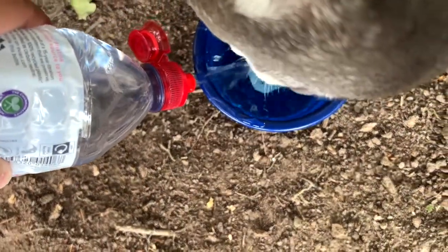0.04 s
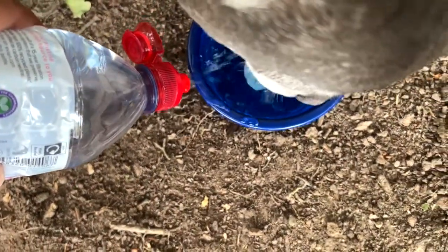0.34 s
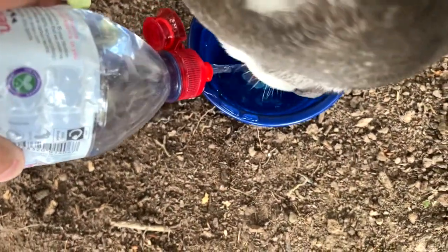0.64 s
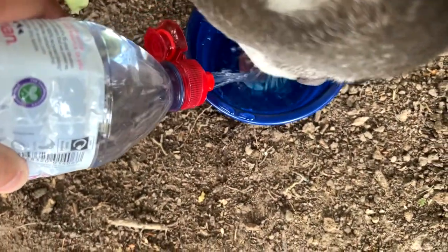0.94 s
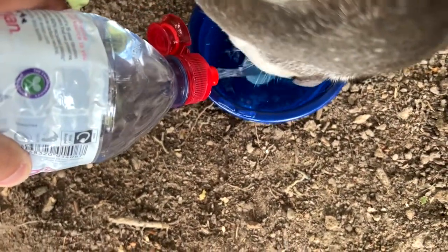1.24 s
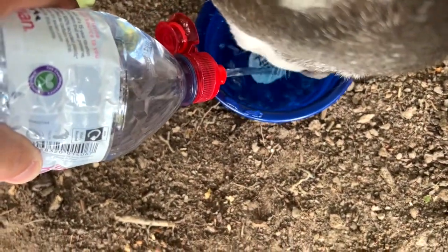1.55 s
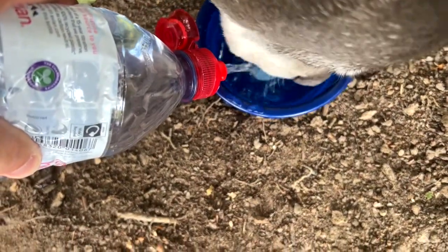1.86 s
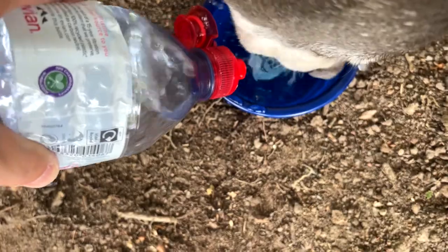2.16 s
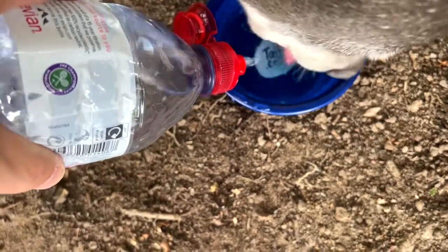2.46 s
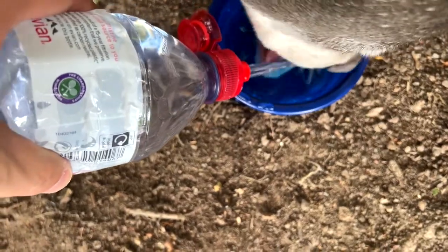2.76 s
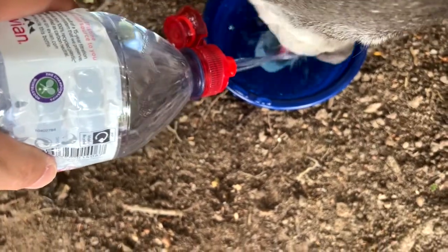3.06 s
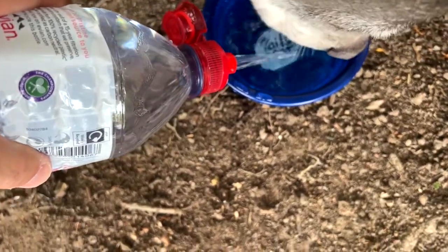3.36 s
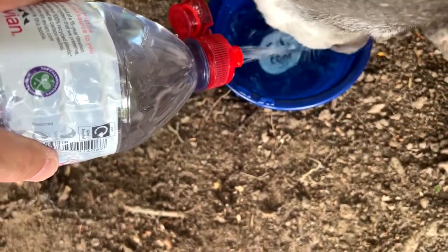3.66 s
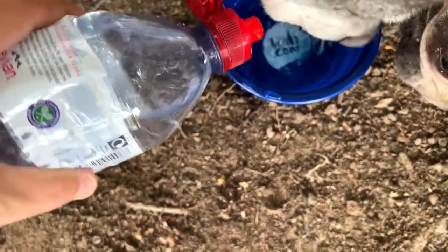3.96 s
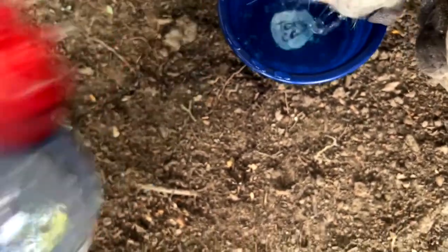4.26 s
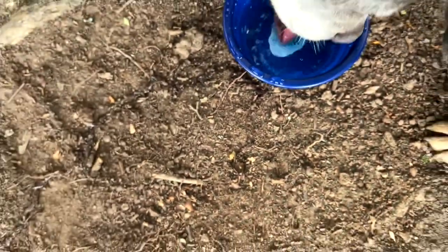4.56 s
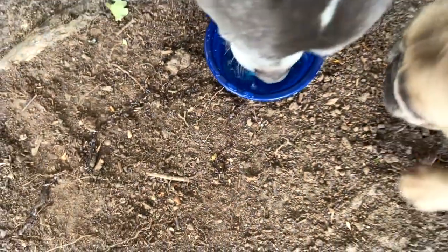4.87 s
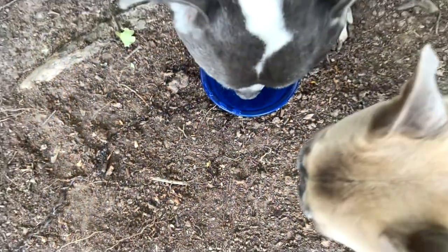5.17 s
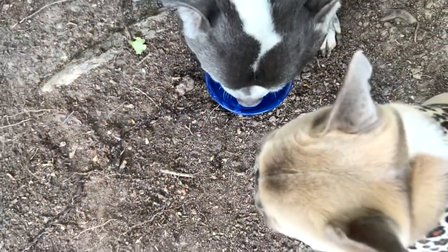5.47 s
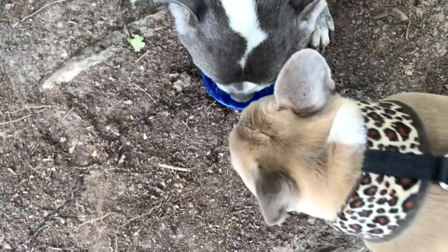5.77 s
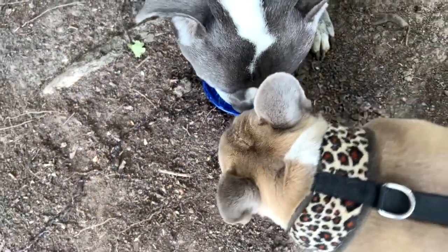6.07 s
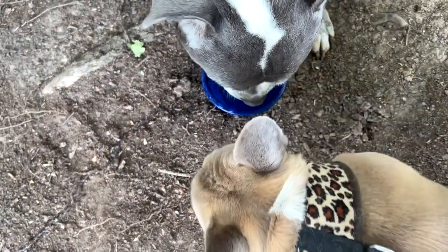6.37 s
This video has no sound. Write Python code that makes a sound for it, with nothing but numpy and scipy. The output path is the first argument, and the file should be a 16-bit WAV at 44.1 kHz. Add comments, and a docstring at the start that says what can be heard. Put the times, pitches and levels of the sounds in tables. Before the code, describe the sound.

From the start, water squirts in uneven spurts from a plastic bottle into a small bowl while a dog laps close to the microphone, about three licks a second. Each lick throws drops and small ringing bubbles and ends in a wet smack. Gulps, low sloshing and soft bottle knocks sit underneath, with one stronger thump at about 1 second. The splashing grows livelier and brighter from around 2 to 4 seconds. Near 4 seconds the bottle is swung away, making a deep flutter of air on the microphone and a few low bumps. By 4.6 seconds the trickle has stopped and the splashes sound duller. The lapping goes on more softly until the end at about 6.5 seconds. Between 5.1 and 5.9 seconds a distant bird gives five faint, short falling whistles over quiet outdoor air.

```python
"""From the start, a plastic bottle squirts water into a small bowl while a dog laps, about three licks a second.
Each lick throws drops and ringing bubbles and ends in a wet smack; gulps and bottle knocks thump below.
Near 4 s the bottle is swung away with a deep flutter of air; by 4.6 s the jet is gone and the spray duller.
The lapping goes on more softly, and from 5.1 s a far bird whistles five times over quiet outdoor air."""
import sys
import numpy as np
from scipy import signal
from scipy.fft import rfft, irfft
from scipy.io import wavfile
from scipy.ndimage import uniform_filter1d

SR = 44100
rng = np.random.default_rng(int(sys.argv[2]) if len(sys.argv) > 2 else 0)


def transcribe(u):
    """Save the signal u as a 16-bit wav file named by the first command-line argument.

    u: samples, shape (n,) or (channels, n), limited to [-1, 1]; the rate is SR.
    q: integer samples, one column per channel.
    """
    v = np.clip(np.atleast_2d(u).T, -1, 1)
    q = np.round(v * 32767).astype(np.int16)
    wavfile.write(sys.argv[1], SR, q)


N = 282842
TIME = np.arange(N) / SR
HZ = np.fft.rfftfreq(N, 1 / SR)


# Tongue in the water: t/s, length/s, spatter/dB, spray/dB, mid-lap swell/dB, slosh/dB
LAPS = [(-0.04, 0.15, -48, -57, -1, -65), (0.168, 0.032, -49, -65, -1, -49),
        (0.32, 0.13, -48, -65.5, -7, -45), (0.646, 0.11, -47, -55, 2.5, -42),
        (1.011, 0.13, -46, -51, -1.5, -50.5), (1.353, 0.11, -42, -51, -2, -50.5),
        (1.764, 0.081, -36.5, -42, -10, -48), (2.071, 0.14, -40, -45.5, 1, -46.5),
        (2.431, 0.16, -47.5, -59, 3.5, -43.5), (2.784, 0.12, -42, -47.5, -1, -44),
        (3.153, 0.12, -43, -42.5, -3, -43), (3.505, 0.099, -36.5, -42.5, -6.5, -45),
        (3.856, 0.14, -40.5, -49.5, -1.5, -43.5), (4.222, 0.11, -39.5, -46.5, 0.5, -37),
        (4.581, 0.15, -48.5, -50, 1.5, -53), (4.942, .11, -45, -47, -6, -43.5),
        (5.24, 0.19, -53, -53.5, -0.5, -52), (5.632, 0.12, -49.5, -54, -2.5, -46.5),
        (6.001, 0.14, -51, -54.5, 1.5, -52.5), (6.356, 0.067, -48, -54.5, -4.5, -45)]


def laps(column):
    """Gain of the tongue's stirring: quick rise, sagging or swelling hold, quick fall, dribble from the lips."""
    dribble_delay_s, dribble_width_s, dribble_db = 0.14, 0.12, -17.5
    power = np.zeros(N)
    for row in LAPS:
        t, length_s, swell_db = TIME - row[0], row[1], row[4]
        swell = amp(swell_db * np.sin(np.pi * np.clip(t / length_s, 0, 1)))
        splash = plateau(t, length_s, rise_s=0.01, fall_s=0.0098) * swell
        offset = (t - length_s - dribble_delay_s) / dribble_width_s
        dribble = amp(dribble_db) * np.exp(-np.minimum(offset ** 2, 20))
        power += (amp(row[column]) * (splash + dribble)) ** 2
    return np.sqrt(power)


# Spurts from the bottle, then its swill as it swings away: t/s, spatter/dB, spray/dB
JET_SPURTS = [(0, -55, -54.5), (.28, -65, -61), (.34, -50, -51.5), (.6, -54.5, -62), (.8, -51, -58),
              (.95, -46, -54.5), (1.2, -53.5, -57), (1.4, -48, -59.5), (1.55, -54, -63), (1.9, -52.5, -57),
              (2.02, -67, -73), (2.42, -52.5, -53.5), (2.72, -52.5, -61.5), (2.82, -44, -45),
              (3.0, -48, -51), (3.12, -50, -48.5), (3.46, -46, -53), (3.78, -50.5, -54.5), (4.05, -56, -72),
              (4.13, -50.5, -56.5), (4.47, -55, -66), (4.58, -83, -64)]
# Small bubbles: f/Hz, level/dB
SPATTER_SPECTRUM = [(300, -13.5), (500, 1), (800, -10.5), (1150, 5.5), (1650, -2.5), (2150, 0.5),
                    (3200, -3.5), (4100, -10.5), (4800, -8), (6000, -14), (8000, -21), (10000, -26),
                    (16000, -30.5)]
# Fine spray: f/Hz, level/dB
SPRAY_SPECTRUM = [(3500, 5), (5800, -3), (7000, 0.5), (8300, 2.5), (9000, 1), (10000, -9.5), (11700, 1),
                  (14000, -2.5), (16000, -6.5)]


def trickle():
    """Tongue and jet stir the water: calm, it hisses; stirred hard, separate drops and mist fly."""
    calm_db, jet_grain_db, drops_fly_db, mist_flies_db = -62, -6, -48, -51
    tongue, jet = np.hypot(laps(column=2), amp(calm_db)), level(JET_SPURTS, 1)
    stir = np.hypot(tongue, jet)
    fling = np.hypot(laps(column=3), level(JET_SPURTS, 2))
    bubbles = droplets(per_s=1900, spread_db=4.6, low_hz=450, high_hz=7500,
                       cycles=8.5, glide=.35, rise_cycles=2.2)
    mist = droplets(per_s=1400, spread_db=6.6, low_hz=4500, high_hz=15000,
                    cycles=4.5, glide=.2, rise_cycles=1.6)
    coarse = np.hypot(tongue, jet * amp(jet_grain_db))  # the jet breaks into finer drops
    wash = np.where(TIME < JET_SPURTS[-1][0], 1, amp(-6))  # jet gone: even soft laps click
    drop_share = coarse / (coarse + amp(drops_fly_db) * wash)
    mist_share = fling ** 2 / (fling ** 2 + amp(mist_flies_db) ** 2)
    spatter = colour(drop_share * unit(bubbles) + amp(-21.5) * rng.standard_normal(N), SPATTER_SPECTRUM)
    spray = colour(mist_share * unit(mist) + amp(-11) * rng.standard_normal(N), SPRAY_SPECTRUM)
    clumps = unit(uniform_filter1d(uniform_filter1d(rng.standard_normal(N), 400), 300))
    spatter = unit(steadied(spatter, window_s=.06) * amp(2.0 * drop_share * clumps)) * stir
    spray = unit(steadied(spray, window_s=.08) * amp(2.6 * mist_share * clumps)) * fling
    return panned(spatter, pan_db=3.5) + panned(lifted(spray), pan_db=0.5)


# Tongue smacks and splashes: peak t/s, level/dB over 10 ms, spread/s, cavity f/Hz, treble/dB
SMACKS = [(0.047, -32, 0.0045, 1265, -10), (0.207, -31, 0.0029, 1600, 3.5),
          (0.215, -34.5, 0.0032, 1650, -1), (0.423, -32.5, 0.007, 1280, -8),
          (0.736, -33.5, 0.0022, 1160, -7), (0.744, -25.5, 0.0019, 3256, -5),
          (0.755, -35, 0.0033, 2200, -23), (1.119, -32, 0.0017, 1230, -18), (1.129, -32, 0.0026, 1210, 1.5),
          (1.457, -27.5, 0.0022, 754, -2), (2.162, -26, 0.0017, 2980, -20),
          (2.178, -32.5, 0.0033, 1200, -3), (2.211, -32.5, 0.00096, 1790, -5),
          (2.2155, -31.5, 0.0019, 1540, -3), (2.556, -27, 0.002, 1230, -2), (2.797, -34, 0.0093, 1110, -38),
          (2.886, -29, 0.0058, 990, -8), (3.273, -30, 0.0048, 1290, -1.5), (3.6, -26, 0.0035, 1350, -1),
          (3.982, -28.5, 0.0027, 1530, -11), (3.993, -32, 0.00297, 720, -17),
          (4.273, -31.5, 0.0034, 1260, -14), (4.318, -28.5, 0.0052, 1170, 3.5),
          (4.702, -31.5, 0.0025, 1276, -35), (5.023, -34.5, 0.0021, 2010, -11),
          (5.033, -29.5, 0.0031, 1380, 1.5), (5.398, -42, 0.0051, 690, 2), (5.411, -38, 0.0055, 1290, 0),
          (5.735, -35.5, 0.0043, 1380, -3), (6.121, -39, 0.0053, 1220, 14)]
# Wet mouth: f/Hz, level/dB
MOUTH_SPECTRUM = [(150, -16), (350, 9.5), (750, -14), (1200, 12.5), (1650, -4.5), (2200, 7.5), (3200, -2),
                  (5000, -3), (7000, -11.5), (10000, -22), (12000, -20), (16000, -36)]


def smacks():
    """The wet tongue peels away in a ragged run of snaps and bubbles that ring the mouth."""
    snaps_per_s, rise_share, fall_share = 1500, 1.26, 0.93
    out, t = np.zeros((2, N)), np.arange(-1500, 2500) / SR
    for peak_s, db, spread_s, cavity_hz, treble_db in SMACKS:
        snaps = rng.standard_normal(len(t)) * (.06 + (rng.random(len(t)) < snaps_per_s / SR))
        flank_s = spread_s * np.where(t < 0, rise_share, fall_share)
        snaps = steadied(snaps, window_s=.004) * np.exp(-abs(t) / flank_s)
        spectrum = [(hz, gain_db + np.clip(np.log2(hz / 3500), 0, 1) * (treble_db + 11.5))
                    for hz, gain_db in MOUTH_SPECTRUM]
        ring = bubble(cavity_hz, width_hz=94, glide=rng.uniform(-0.045, 0.09), rise_cycles=0.043)
        cavity = signal.fftconvolve(snaps, ring)[:len(t)]
        foam = froth(t, spread_s, low_hz=715, high_hz=4890)
        sound = unit(colour(snaps, spectrum)) + amp(-2) * unit(cavity) + amp(-3) * unit(foam)
        add(out, peak_s + t[0], panned(burst(sound, db), pan_db=3.5))
    return out


def froth(t, spread_s, low_hz, high_hz, count=7):
    """A few bubbles of mixed size burst around t = 0."""
    out = np.zeros((1, len(t)))
    for when, size, climb in rng.random((count, 3)):
        hz = low_hz * (high_hz / low_hz) ** size
        ring = bubble(hz, width_hz=130 + 0.016 * hz, glide=0.55 * climb, rise_cycles=1.15)
        add(out, (when - .6) * 2.5 * spread_s - t[0], unit(ring)[None] / np.sqrt(hz))
    return out[0]


# Single drops and bursting bubbles: t/s, level/dB over 10 ms, f/Hz, snap/dB, left over right/dB
POPS = [(0.2224, -36.5, 1230, -29, 6), (0.657, -41.5, 1940, -19, 7), (1.104, -43.5, 700, -6, 1),
        (1.23, -44.5, 2160, -9, 3), (1.4377, -33.5, 1230, -17, 4), (1.3113, -38.5, 1310, -3, 3),
        (1.3884, -38, 1090, -1, 5), (1.6656, -40, 1480, -9.5, 4), (1.775, -38.5, 844, -2, 10),
        (1.8143, -36.5, 4330, 1, 3), (1.8565, -36.5, 2200, -14, 12), (2.036, -42.5, 5070, -43, 1),
        (2.088, -32, 1190, -10, 5), (2.1703, -23.5, 666, 12, 3), (2.3582, -33.5, 730, -20, 19),
        (2.396, -36, 770, -20, 19), (2.434, -35.5, 1740, -34, 13), (2.4414, -35.5, 4200, -6, 8),
        (2.471, -34, 1290, -11, 2), (2.5373, -32, 2210, -41, 2), (2.5448, -29.5, 2400, -13, 3),
        (2.7854, -33.5, 1330, -33, 1), (3.1851, -27, 3870, -17, 6), (3.2213, -28, 1800, -11, 18),
        (3.255, -30, 464, -12, 0), (3.4139, -26.5, 670, -18, 10), (3.5253, -34, 4900, -8, 2),
        (3.542, -36, 627, -11, 0), (3.7424, -33.5, 1160, -12, 1), (3.8127, -25.5, 2110, -21, 1.5),
        (3.841, -34.5, 3000, -7, 1), (3.89, -27, 980, -13, 14), (3.899, -30, 3370, -15, 5),
        (3.9498, -34, 1720, 3, 0), (3.993, -23.5, 464, -30, 7), (4.2533, -32, 6900, -1, 0),
        (4.272, -26, 493, -3, 7), (4.338, -30.5, 2150, -2, 10), (4.5851, -38.5, 3400, -38, 3),
        (4.598, -39.5, 4200, -27, 4), (4.613, -40.5, 2840, -11, 2), (4.714, -41.5, 2390, -25, 3),
        (4.927, -41.5, 3630, -9, 4), (5.292, -36, 1420, -10.5, 3), (5.632, -41, 3080, -0.5, 2),
        (5.658, -34.5, 920, -28, 4), (5.69, -42, 1210, -30, 5), (5.9587, -44.5, 2780, -16, 3),
        (6.033, -42.5, 4440, -29, -1), (6.0608, -37, 2310, -17, 0), (6.348, -43, 3520, -28, 3),
        (6.3574, -37, 1540, -50, 1), (6.379, -35, 1090, -45, -1)]


def pops():
    """A drop lands with a snap and leaves a rising ring; small or hard-hit bubbles die sooner."""
    early_burst_db = -24.5
    out = np.zeros((2, N))
    for start_s, db, hz, snap_db, pan_db in POPS:
        width_hz = 108 + 0.085 * hz * (1 + amp(db - early_burst_db) ** 2)
        cycles = hz / width_hz
        rise_cycles = 0.11 * cycles / (1 + amp(snap_db + 13.5))  # soft landings swell slowly
        ring = bubble(hz, width_hz, glide=min(.025 * cycles, .25), rise_cycles=rise_cycles)
        t = np.arange(len(ring)) / SR
        snap = colour(rng.standard_normal(len(t)) * np.exp(-t / .0005), SPRAY_SPECTRUM)
        splash = colour(rng.standard_normal(len(t)) * np.sqrt(t) * np.exp(-t / 0.0027), MOUTH_SPECTRUM)
        sound = unit(ring) + amp(snap_db) * unit(snap) + amp(-5.5 + 0.27 * snap_db) * unit(splash)
        add(out, start_s, panned(burst(sound, db), pan_db))
    return out


# Surfacing bubbles: peak t/s, level/dB over 10 ms, f/Hz
CHIRPS = [(0.306, -45, 2170), (0.365, -44, 1120), (0.464, -46.5, 2060), (0.745, -35.5, 2216),
          (0.902, -46.5, 2830), (1.027, -34.5, 2900), (1.13, -36, 2326), (1.654, -46, 2820),
          (1.741, -33, 2800), (1.856, -39, 1166), (2.066, -40, 1320), (2.082, -37.5, 3310),
          (2.488, -44, 1240), (2.557, -37, 4690), (2.573, -37, 3250), (2.802, -39, 1025),
          (2.888, -36, 3160), (3.194, -38, 2960), (3.239, -40, 3380), (3.52, -38, 2700), (3.56, -35, 1120),
          (3.609, -45, 4400), (3.767, -42, 3030), (3.891, -33.5, 3300), (3.905, -37, 1870),
          (3.917, -41.5, 7050), (3.926, -38, 2900), (3.931, -44, 4200), (3.956, -33.5, 1700),
          (4.125, -45, 1660), (4.239, -40, 6500), (4.361, -45, 2350), (4.677, -42, 1640),
          (4.964, -42.5, 2830), (5.2403, -38, 1710), (5.258, -44, 1560), (5.66, -44, 1157),
          (5.741, -41, 2255), (5.966, -44.5, 1325), (6.014, -46, 2230), (6.407, -43, 1220)]


def chirps():
    """A surfacing bubble swells and fades in milliseconds, climbing in pitch amid a wet rustle."""
    flank_s, octaves_per_s, rustle_db = 0.0014, 42, -14
    out, t = np.zeros((2, N)), np.arange(-512, 512) / SR
    for peak_s, db, hz in CHIRPS:
        swell = 1 / np.cosh(t / (flank_s * 2 ** rng.uniform(-0.65, 0.64)))
        note = np.sin(2 * np.pi * np.cumsum(hz * 2 ** (octaves_per_s * t)) / SR)
        rustle = amp(rustle_db) * unit(colour(rng.standard_normal(len(t)), MOUTH_SPECTRUM))
        add(out, peak_s + t[0], panned(burst(swell * (note + rustle), db), pan_db=2.5))
    return out


# Plops and bottle knocks: t/s, level/dB over 10 ms, f/Hz
THUMPS = [(0.418, -33.5, 352), (0.989, -12.5, 158), (1.125, -36, 383), (2.171, -27.5, 276),
          (2.202, -32.5, 282), (2.359, -33.5, 305), (2.447, -33.5, 310), (2.547, -36, 410),
          (2.666, -38.5, 171), (2.881, -28.5, 285), (2.956, -46, 246), (3.12, -34, 105), (3.271, -29, 318),
          (3.414, -35.5, 430), (3.598, -30.5, 324), (3.632, -27.5, 175), (3.995, -18.5, 94.5),
          (3.994, -23.5, 356), (4.034, -23.5, 89), (4.063, -26.5, 90), (4.095, -29.5, 136),
          (4.263, -30, 81.4), (4.296, -33, 85), (4.338, -27.5, 277), (4.419, -39, 148), (4.56, -37.5, 103),
          (4.77, -44.5, 298), (5.001, -40.5, 126), (5.028, -33, 369), (5.08, -33, 187), (5.117, -36, 198),
          (5.309, -27.5, 218), (5.393, -39, 450), (5.73, -37, 194), (5.79, -39, 190), (6.102, -33, 343),
          (6.171, -38, 133), (6.28, -40.5, 205)]


def thumps():
    """Big air pockets and soft knocks ring for two or three cycles, sagging in pitch."""
    out = np.zeros((2, N))
    for start_s, db, hz in THUMPS:
        ring = bubble(hz, width_hz=38 + 0.15 * hz, glide=-0.53, rise_cycles=0.39, size=4096)
        add(out, start_s, panned(burst(ring, db), pan_db=1.0))
    return out


# Gulps and hollow gurgles: t/s, length/s, level/dB, f/Hz
GURGLES = [(0.657, 0.02, -38, 197), (1.502, 0.086, -41, 128), (1.797, 0.058, -42.5, 256),
           (2.083, 0.12, -36, 284), (2.395, 0.059, -38.5, 238), (2.917, 0.06, -42, 212),
           (3.625, 0.053, -43.5, 264), (3.856, 0.006, -30.5, 260), (5.065, 0.036, -45, 283),
           (5.159, 0.013, -38, 190), (5.229, 0.08, -38.5, 186), (5.517, 0.028, -42, 213)]


def gurgles():
    """Churning water keeps a large air pocket ringing for a moment."""
    out, t = np.zeros((2, N)), np.arange(-2000, 12000) / SR
    for start_s, length_s, db, hz in GURGLES:
        pocket = bubble(hz, width_hz=0.96 * hz, glide=0.042, rise_cycles=0.36)
        churn = steadied(signal.fftconvolve(rng.standard_normal(len(t)), pocket, "same"), window_s=0.062)
        envelope = plateau(t, length_s, rise_s=0.0097, fall_s=0.015)
        add(out, start_s + t[0], panned(amp(db) * churn * envelope, pan_db=1.5))
    return out


# Tiny drops and crackles on plastic: t/s, level/dB over 10 ms
TICKS = [(0.0747, -34.5), (0.985, -47), (1.247, -49.5), (1.306, -53), (1.594, -50), (1.776, -59),
         (1.8675, -32.5), (2.012, -51), (2.0812, -49), (2.6616, -43), (2.757, -42), (3.161, -40.5),
         (3.259, -48), (3.4542, -43), (3.542, -32), (3.7173, -43), (3.781, -46), (4.077, -44), (4.176, -44),
         (4.3642, -39), (4.498, -43.5), (4.669, -38.5), (4.75, -54), (4.842, -49)]


def ticks():
    """A bare snap on plastic with a very short, high ring of varying pitch."""
    snap_decay_s = 0.00017
    out = np.zeros((1, N))
    for start_s, db in TICKS:
        ring = bubble(hz=11600 * rng.uniform(1.0, 1.28), width_hz=1030, glide=0.39, rise_cycles=1.55)
        t = np.arange(len(ring)) / SR
        snap = colour(rng.standard_normal(len(t)) * np.exp(-t / snap_decay_s), SPRAY_SPECTRUM)
        add(out, start_s, burst(unit(snap) + amp(-2) * unit(ring), db)[None])
    return panned(lifted(out[0]), pan_db=1.5)


# Water rocking in the bowl: f/Hz, level/dB
SLOSH_SPECTRUM = [(20, -48), (40, -22), (65, -1.5), (110, 1), (170, -0.5), (300, -4), (420, -9.5),
                  (650, -18.5), (1200, -27)]


def slosh():
    """Low plops swell as the tongue leaves and sets the water rocking, then settle."""
    calm_db, hold_s = -58.5, 0.073
    plops = droplets(per_s=200, spread_db=6.5, low_hz=56.7, high_hz=697,
                     cycles=3.8, glide=0.058, rise_cycles=0.54)
    rumble = steadied(colour(plops, SLOSH_SPECTRUM), window_s=0.15)
    power = np.full(N, amp(calm_db) ** 2)
    for start_s, length_s, *_, db in LAPS:
        power += (amp(db) * plateau(TIME - start_s - length_s, hold_s, rise_s=0.17, fall_s=0.06)) ** 2
    return panned(rumble, pan_db=1.0) * np.sqrt(power)


# Hand swinging the bottle away: t/s, level/dB
HAND_SWING = [(3.8, -71), (3.9, -40), (4.0, -34), (4.18, -37.5), (4.3, -28), (4.55, -65)]


def hand_flutter():
    """The moving hand stirs the air at the microphone ports: a deep flutter, partly different at each."""
    band = signal.butter(2, [48, 125], "band", fs=SR, output="sos")
    common, left, right = signal.sosfilt(band, rng.standard_normal((3, N)))
    flutter = np.array([steadied(common + port, window_s=0.31) for port in (left, right)])
    return flutter * level(HAND_SWING, 1)


# Far bird: t/s, length/s, start f/Hz, end f/Hz, relative level/dB
WHISTLES = [(5.148, 0.069, 2096, 2002, -48.5), (5.295, 0.038, 2990, 2800, -49),
            (5.437, 0.048, 2950, 2810, -48.5), (5.631, 0.056, 2200, 1980, -51),
            (5.783, 0.061, 2170, 1835, -51.5)]


def bird():
    """Falling, wavering whistles, blurred by distance."""
    waver_hz = 65
    out = np.zeros((2, N))
    for start_s, length_s, start_hz, end_hz, db in WHISTLES:
        pitch_hz = np.linspace(start_hz, end_hz, int(length_s * SR))
        waver = unit(uniform_filter1d(rng.standard_normal(N), 60))[:len(pitch_hz)]
        phase = 2 * np.pi * np.cumsum(pitch_hz + waver_hz * waver) / SR
        note = (np.sin(phase) + amp(-16) * np.sin(2 * phase)) * signal.windows.hann(len(phase))
        add(out, start_s, panned(amp(db) * unit(note), pan_db=4.0))
    return amp(-7) * out + amp(-5) * scatter(out, t60_s=.55, size=32768)


# Outdoor background: f/Hz, level/dB
AIR_SPECTRUM = [(25, -42), (60, 3), (130, 8), (300, -4.5), (650, -10.5), (1300, -16), (2600, -34),
                (4800, -25), (9000, -70), (16000, -71)]


def air():
    """Quiet outdoor noise, partly alike at both ports."""
    common, left, right = (colour(rng.standard_normal(N), AIR_SPECTRUM) for _ in range(3))
    return amp(-55.5) * unit(common + 2.0 * np.array([left, right]))


# Change in the spray heard from higher up: f/Hz, level/dB
LIFT_RESPONSE = [(4000, -2.5), (6000, 2.5), (8000, -4), (12000, -7), (16000, -5)]


def lifted(spray, start_s=4.36, takes_s=0.28):
    """The spray dulls as the microphone is lifted from the bowl."""
    far = np.clip((TIME - start_s) / takes_s, 0, 1)
    return (1 - far) * spray + far * colour(spray, LIFT_RESPONSE)


def scatter(x, t60_s, size=16384, hop=4096):
    """Diffuse reflections without bass, different at each port, changing as heads and bottle move."""
    t, out = np.arange(size) / SR, np.zeros((2, N))
    no_bass = signal.butter(2, 400, "high", fs=SR, output="sos")
    for start in range(-hop, N, hop):
        span = np.arange(max(start, 0), min(start + 2 * hop, N))
        piece = x[:, span] * np.sin(np.pi * (span - start) / (2 * hop))
        tails = signal.sosfilt(no_bass, rng.standard_normal((2, size)) * amp(-60 * t / t60_s) * (t > .0008))
        tails /= np.linalg.norm(tails, axis=1, keepdims=True)
        add(out, span[0] / SR, signal.fftconvolve(piece, tails, axes=1))
    return out


def bubble(hz, width_hz, glide, rise_cycles, size=2048):
    """A damped air pocket swells, then slides by glide * hz as it dies."""
    t = np.arange(size) / SR
    decay = np.exp(-np.pi * width_hz * t)
    pitch_hz = hz * (1 + glide * (.5 - np.sqrt(decay)))
    swell = 1 - np.exp(-(t * hz / max(rise_cycles, .01)) ** 2)
    return decay * swell * np.sin(2 * np.pi * np.cumsum(pitch_hz) / SR)


def droplets(per_s, spread_db, low_hz, high_hz, cycles, glide, rise_cycles, sizes=40):
    """A steady rain of bubbles of many sizes, a few much louder than the rest."""
    out = np.zeros(N)
    for hz in np.geomspace(low_hz, high_hz, sizes):
        width_hz = hz / (cycles * rng.uniform(0.78, 1.4))
        ring = bubble(hz, width_hz, glide * rng.uniform(-0.017, 1), rise_cycles)
        gains = amp(spread_db * np.minimum(rng.exponential(1, N), 3.5))
        hits = rng.random(N) < per_s / sizes / SR
        out += signal.oaconvolve(gains * hits, unit(ring) * np.sqrt(hz))[:N]
    return out


def colour(x, spectrum, size=2048):
    """Minimum-phase filter from (f/Hz, level/dB) points; clicks keep a sharp front."""
    hz, db = np.transpose(spectrum)
    bins_hz = abs(np.fft.fftfreq(size, 1 / SR))
    log_gain = np.log(amp(np.interp(np.log(bins_hz + 1), np.log(hz + 1), db)))
    taps = np.fft.ifft(np.exp(np.conj(signal.hilbert(log_gain)))).real[:size // 2]
    return signal.fftconvolve(x, taps)[:len(x)]


def steadied(x, window_s):
    """Evens out a texture's slow swell, keeping its grain."""
    power = signal.oaconvolve(x ** 2, signal.windows.hann(int(window_s * SR) | 1), "same")
    return unit(x / np.sqrt(abs(power) + 0.15 * power.mean()))


def plateau(t, length_s, rise_s, fall_s):
    """1 from t = 0 to length_s, with exponential flanks."""
    return np.exp(np.maximum(np.minimum(t, 0) / rise_s - np.maximum(t - length_s, 0) / fall_s, -20))


def level(table, column):
    """Gain over time from a dB column."""
    rows = np.array(table)
    return amp(np.interp(TIME, rows[:, 0], rows[:, column]))


def amp(db):
    """dB to gain."""
    return 10 ** (np.asarray(db) / 20)


def unit(x):
    """Scales to rms 1."""
    return x / np.sqrt(np.mean(x ** 2) + 1e-20)


def burst(x, db):
    """Scales to the energy of 10 ms at the given level."""
    return x * amp(db) * np.sqrt(SR / 100 / (np.sum(x ** 2) + 1e-20))


def panned(x, pan_db):
    """Constant-power pan; positive is left."""
    return unit(amp([[pan_db / 2], [-pan_db / 2]])) * x


def add(mix, start_s, sound):
    """Mixes a sound in at start_s."""
    part = mix[:, max(round(start_s * SR), 0):][:, :sound.shape[1]]
    part += sound[:, :part.shape[1]]


def scene():
    """Bowl, bottle and ground scatter the water sounds at once; the open yard returns only a trace."""
    water = trickle() + pops() + chirps() + ticks() + smacks() + thumps() + slosh() + gurgles()
    close = amp(-5.5) * scatter(water, t60_s=0.017, size=2048)
    yard = amp(-20.5) * scatter(water, t60_s=0.2)
    return amp(-0.95) * water + close + yard + hand_flutter() + bird() + air()


# Microphone ports: f/Hz, phase lead of left/rad
PORT_PHASE = [(0, 0), (700, .4), (1900, 0), (3200, 1), (5800, 0), (7700, -.1), (9700, -3.1), (12500, -6.2),
              (16000, -7)]


def record(dry):
    """Two ports on a small body hear the scene with a phase difference; then the band limits."""
    low_cut_hz, high_cut_hz = 38., 16300
    turn = np.exp(.5j * np.interp(HZ, *np.transpose(PORT_PHASE)))
    high_pass = HZ ** 5 / np.sqrt(HZ ** 10 + low_cut_hz ** 10)
    ports = irfft(rfft(dry) * high_pass * np.array([turn, 1 / turn]), N)
    low_pass = signal.firwin(255, high_cut_hz, window=("kaiser", 9), fs=SR)
    return signal.oaconvolve(ports, low_pass[None], "same")


dry = scene()
out = record(dry)
transcribe(out)
```